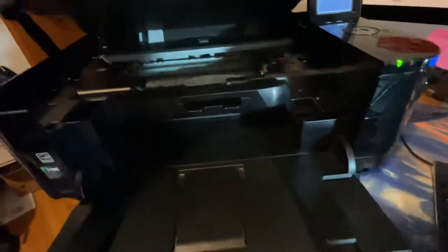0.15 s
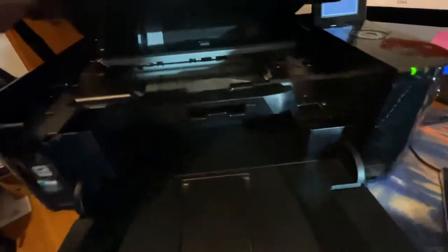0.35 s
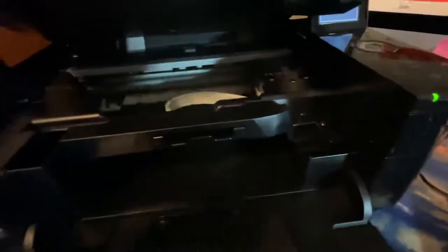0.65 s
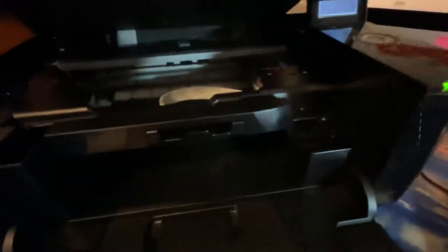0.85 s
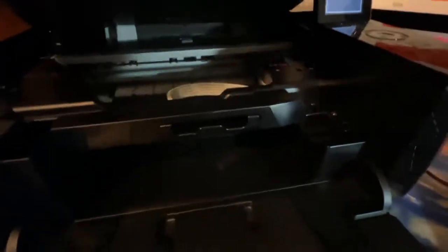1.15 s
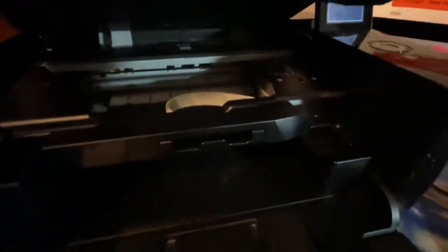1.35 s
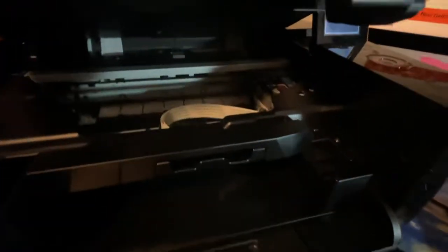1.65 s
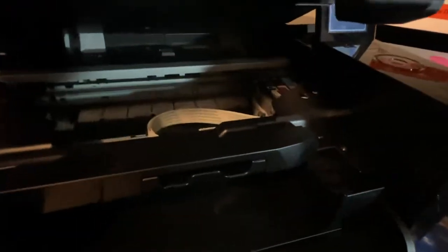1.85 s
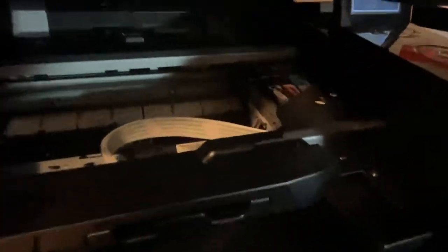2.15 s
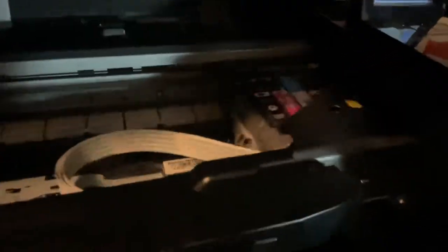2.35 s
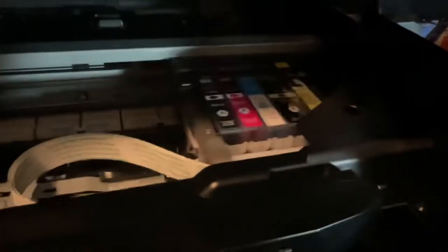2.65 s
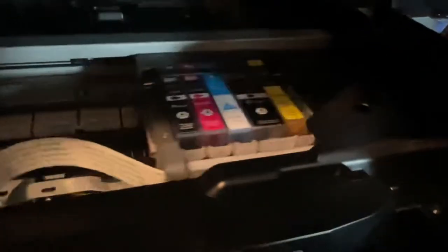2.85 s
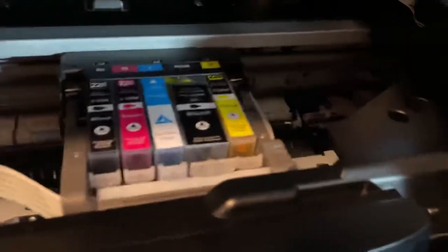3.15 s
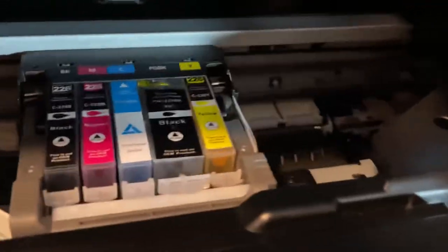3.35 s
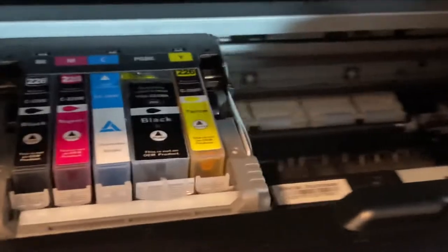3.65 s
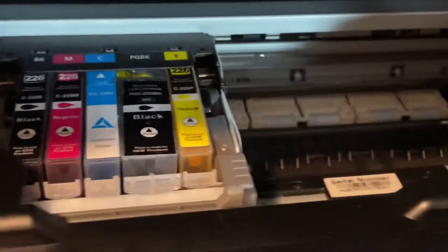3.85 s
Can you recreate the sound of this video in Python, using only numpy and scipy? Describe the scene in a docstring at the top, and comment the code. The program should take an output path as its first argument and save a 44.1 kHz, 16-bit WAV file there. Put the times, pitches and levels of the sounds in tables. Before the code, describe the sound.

An open inkjet printer clatters at once: dense plastic knocks, loudest near 0.15 s, and a sharp snap around 0.29 s. A gear whirr with motor hum fades by 1 s. Quiet room hum and barely audible creaks follow. At 2.05 s a brief motor buzz, then clicks near 2.2 s, release the carriage, which glides softly to 4 s, humming and rumbling in pulses with faint hiss, increasingly close; tiny ticks near 3.3 s.

```python
"""Open inkjet printer, close up

The head-parking mechanism of an open printer rattles and clacks in its plastic case: bursts of tiny contacts
excite the panels, and pawls snap. A gear train whirrs down as friction noise in resonances over a motor hum.
After a pause with faint creaks, a quick motor run frees the carriage with a click. It glides along its rail,
drive humming and rumble swelling with every pulley turn; the ear moves close. A small room and hum surround it."""
import sys
import numpy as np
from scipy import signal
from scipy.fft import rfft, irfft
from scipy.io import wavfile
from scipy.ndimage import map_coordinates

SR = 44100
rng = np.random.default_rng(int(sys.argv[2]) if len(sys.argv) > 2 else 0)


def wav_record(signal):
    """Record a signal, one row per channel, as 16-bit PCM in the file named by sys.argv[1]."""
    frames = np.transpose(np.atleast_2d(signal))
    bounded = np.clip(frames, -1, 1)
    # unit amplitude maps onto the largest positive 16-bit level
    quanta = np.round(bounded * 32767).astype(np.int16)
    wavfile.write(sys.argv[1], SR, quanta)


N = 176400
T = np.arange(N) / SR

# Plastic parts knocking in the case, before the master trim and the decay stretch:
# start_s, thud_db, body_db, crack_db, decay_s
KNOCK_EVENTS = [(0.001, -55, -24.5, -27, 0.0067), (0.009, -27, -32.5, -37, 0.019),
                (0.022, -36, -34, -33.5, 0.013), (0.037, -34, -32, -54, 0.0053),
                (0.0473, -38, -48, -26, 0.0071), (0.058, -48, -32.5, -31, 0.0066),
                (0.081, -39, -32.5, -34, 0.02), (0.1299, -33, -30, -31, 0.003),
                (0.1426, -49, -38, -27.5, 0.0042), (0.1465, -35, -21.5, -17.5, 0.0066),
                (0.1615, -28, -24.5, -29, 0.011), (0.174, -37, -34.5, -37, .006),
                (0.1841, -33, -36, -27.5, 0.0045), (0.199, -36, -61.5, -49, 0.0041),
                (0.2847, -34, -35, -43, 0.0045), (0.323, -49, -41, -47, 0.0043),
                (0.336, -40, -35, -42.5, 0.017), (0.37, -62, -40, -34.5, 0.0045),
                (0.382, -46, -54, -44, 0.0054), (2.0509, -41, -37.5, -38, 0.0054),
                (2.227, -40, -41.5, -47, 0.0077), (2.243, -44, -46, -57, 0.007)]
# Tone of the knock noise: frequency_hz, relative_level_db
KNOCK_SPECTRUM = [(35, -44), (60, -8.5), (186, -11), (302, 2.5), (399, -18.5), (503, -6), (1750, -14.5),
                  (3750, -17.5), (8420, -22.5), (10100, -23.5), (13000, -28.5), (15000, -42)]
# Lower edges of thud, body and crack: edge_hz
KNOCK_EDGES_HZ = [59, 370, 1500]
# Rise of thud, body and crack; the body swells slowest: rise_s
KNOCK_RISE_S = [0.0013, 0.0037, 0.0026]
# Decay stretch of thud, body and crack; the thud rings longest: factor (no unit)
KNOCK_STRETCH = [1.9, 1.5, 0.96]
# Panel resonances, before the case tilt: pitch_hz, width_hz, level_db
CASE_PANELS = [(295, 100, -7), (559.9, 87, -5.5), (1000, 160, -14.5)]
# Small parts ringing likewise, before their group trim: pitch_hz, width_hz, level_db
FRAME_PARTS = [(1998, 77, -3), (2620, 120, 2), (3180, 95, -4.5), (3790, 380, -2), (4360, 30, -6),
               (4460, 66, -6), (5160, 97, -4), (6293, 170, 0), (7700, 35, -14), (9800, 270, -7.5)]
CASE_DB, CASE_DB_PER_OCT, FRAME_DB = 4, 4, -10
# Lightly damped case modes that ring on after a knock, relative to its body: pitch_hz, level_db, t60_s
CASE_MODES = [(506.3, -17.5, 0.15), (808.5, -18, 0.21), (868.5, -17.5, 0.19), (1070, -18.5, .15),
              (1207, -18.5, .15), (1336, -21, 0.22), (1456, -21.5, 0.16), (1559, -21, 0.13),
              (2380, -22.5, 0.16), (2660, -19, .12), (3050, -35, 0.54), (3830, -20, 0.1), (5210, -22, 0.19),
              (5760, -23, .12)]

# A pawl snaps over: start_s, level_db, pitch_hz
PAWL_EVENTS = [(0.276, -34.5, 2450), (0.287, -28.5, 2663), (2.209, -42.5, 2240)]
# Modes of each pawl: share_of_pitch (no unit), relative_level_db, t60_s
PAWL_MODES = [(1.005, -1.5, 0.033), (.87, -13, 0.02), (1.2, -35, 0.016), (0.68, -13, 0.042),
              (0.49, -8, 0.049), (0.332, -11.5, 0.055)]
PAWL_SNAP_DB = -9
# The chassis shudders under the heavier blows: start_s, level_db, pitch_hz
SHUDDER_EVENTS = [(0.008, -30.5, 308.5), (0.013, -37, 68.6), (0.162, -32.5, 68), (0.289, -35.5, 559),
                  (0.329, -34.5, 571), (0.371, -36, 571), (2.054, -37, 589), (2.059, -38, 131),
                  (2.134, -38, 133.4), (2.213, -45, 541), (2.233, -40.5, 115), (2.237, -42.5, 294.3)]
SHUDDER_T60_S = 0.11

# The gear train running down, before the ring and hiss trims: time_s, level_db
GEAR_LEVEL = [(0, -28), (.2, -72), (.27, -53), (.31, -42), (.37, -40), (.44, -48), (.53, -56), (.65, -61.5),
              (.86, -62), (.96, -76.5), (1.03, -89.5), (1.3, -110)]
# Resonances of the gear train at speed 1: pitch_hz, width_hz, relative_level_db
GEAR_RINGS = [(840, 130, -17), (1240, 100, -12.5), (2020, 100, -14), (2610, 100, -21), (4330, 110, -14.5),
              (4480, 100, -15.5), (6320, 140, -19), (8150, 230, -20.5)]
# Tone of the gear hiss: frequency_hz, relative_level_db
GEAR_HISS = [(59, -32.5), (100, -1.5), (270, -11.5), (420, -6.5), (933, -18.5), (2050, -22.5), (3430, -25),
             (4680, -21), (8350, -27), (14000, -50)]
# Speed of the gears: time_s, relative_speed (no unit)
GEAR_SPEED = [(.45, 1.02), (.53, 0.99), (.63, 0.95), (.75, 1.0), (.87, 0.97)]
# Hum of the gear motor: time_s, level_db
GEAR_MOTOR_LEVEL = [(.38, -67), (.45, -53), (.53, -61.5), (.62, -61), (.85, -67), (.92, -77), (1.05, -100)]
# Motor tones at speed 1: pitch_hz, relative_level_db
GEAR_MOTOR_TONES = [(370, -3), (425, -4.5)]
PUFF_S, PUFF_LENGTH_S, PUFF_DB = 1.04, 0.031, -77.5  # a faint hiss as the gears come to rest

# Tone of the quick move that frees the carriage: frequency_hz, relative_level_db
NUDGE_SPECTRUM = [(53, -37.5), (90, -3.5), (144, -2), (325, 0.5), (590, -1.5), (2050, -26.5), (6510, -20),
                  (7730, -26.5), (11900, -23), (13500, -35), (15000, -90)]
NUDGE_START_S, NUDGE_END_S, NUDGE_RELEASE_S, NUDGE_DB = 2.052, 2.146, 0.028, -45.5

# Slow glide: the pulley turns steadily, with one moment of greatest drag per turn
GLIDE_START_S, GLIDE_RISE_S = 2.225, 0.02
PULLEY_HZ, PULLEY_TOP_S = 4.5, 2.645  # turns per second; one moment of greatest drag
DRIVE_HZ, DRIVE_SWING_HZ, DRIVE_DB = 90.8, 20.89, -53.5
SURGE_LAG_S = 0.047  # the drive surges this long after each drag
SWAY_HZ, SWAY_DB = 55.1, -57.5  # the chassis drones in between
# Listening point moves up to the carriage, start and end: time_s
APPROACH_S = [2.894, 3.374]
# Tone of the case rumble: frequency_hz, relative_level_db
RUMBLE_SPECTRUM = [(76, -3.5), (130, -0.5), (167, -8), (202, 1.5), (227, -11), (274, -1.5), (396, -13),
                   (615, -11.5), (936, -25.5), (1600, -35), (2080, -78), (3520, -120)]
RUMBLE_DB, RUMBLE_SWING_DB = -55.5, 2.5
RUMBLE_NEAR_DB = -2.5  # the case rumbles and shakes less close to the carriage
# Tone of the low case shake: frequency_hz, relative_level_db
SHAKE_SPECTRUM = [(15, -47), (25, -54), (43, -6.5), (91, 4.5), (104, 5), (135, 4.5), (160, -13.5),
                  (210, -18.5), (350, -120)]
SHAKE_DB = -57
# Tone of the sliding hiss: frequency_hz, relative_level_db
RAIL_SPECTRUM = [(500, -41), (1000, -1), (1700, -5), (2600, 1), (3900, 3), (5000, -2), (6200, 1),
                 (7500, -22), (10000, -1.5), (13000, -12.5), (15000, -15)]
# Sliding hiss along the rail, before the hiss trim: time_s, level_db
RAIL_LEVEL = [(2.3, -65.5), (3.104, -65), (3.464, -66), (3.478, -64), (4.0, -65.5)]
# Whirr of the passing carriage: time_s, level_db
PASSING_LEVEL = [(2.2, -97), (3.0, -79), (3.42, -84), (3.55, -73), (4, -69.5)]
# Resonances of that whirr: pitch_hz, width_hz, relative_level_db
PASSING_RINGS = [(1970, 71, -1.3), (2590, 100, 0.35), (3830, 73, 0.18)]
# A high ring of the rail: time_s, level_db
RAIL_SING_LEVEL = [(2.3, -85), (2.8, -75), (3.12, -70), (3.25, -78), (3.62, -74), (3.8, -77), (4, -72.5)]
RAIL_SING_HZ, RAIL_SING_WIDTH_HZ = 5650, 81

# Faint soft creaks, timed at their peak: peak_s, level_db, length_s
CREAK_EVENTS = [(1.605, -74.5, .008), (1.755, -70, 0.023), (1.879, -73, 0.03), (1.957, -76.5, 0.032),
                (2.847, -62.5, 0.0084), (3.295, -59.5, 0.0053), (3.367, -53.5, 0.004)]
CREAK_HZ, CREAK_WIDTH_HZ = 742, 170
# Steady background hum: pitch_hz, level_db, waver_hz
HUM_TONES = [(60.8, -64.5, 1.6), (51.2, -78, 1.2), (199, -75.5, 0.31), (244, -85, 2.2)]
# Tone of the quiet room noise: frequency_hz, relative_level_db
FLOOR_SPECTRUM = [(15, -56), (25, -31.5), (42, -5.5), (64, -7.5), (125, -24.5), (202, -19.5), (271, -27),
                  (363, -28.5), (404, -31.5), (1580, -42), (3730, -47.5), (6540, -43), (15000, -59)]
FLOOR_DB = -67.5

# Stereo width from afar: frequency_hz, side_minus_mid_db
WIDTH_FAR = [(60, -6), (240, -13), (500, -4), (900, 0), (1800, 0), (2500, -4), (3400, 3), (4600, -3.5),
             (7900, 3.5), (11000, -6.5), (14000, 6)]
# Stereo width close to the carriage: frequency_hz, side_minus_mid_db
WIDTH_NEAR = [(60, -25), (110, -10), (200, -25), (380, -13), (700, -15.5), (1290, -12), (2380, -19),
              (4400, -40), (8120, 5.5), (15000, -4.5)]
# Stereo lean of the knocks: frequency_hz, left_minus_right_db
LEAN_EARLY = [(60, 2), (150, -0.5), (380, -4.5), (950, 1.5), (2380, -2.5), (5980, 1.5), (15000, -1.5)]
# Stereo lean of the carriage: frequency_hz, left_minus_right_db
LEAN_LATE = [(60, 1.3), (180, 1.5), (550, 1.9), (1650, 0.29), (4970, 1.4), (15000, 0.0)]
ROOM_T60_S, ROOM_DB, ROOM_CUT_HZ = 0.24, -15, 4600
LOW_CUT_HZ, HIGH_CUT_HZ = 30, 15800


def amp(db):
    """Decibels to gain."""
    return 10 ** (np.asarray(db) / 20)


def unit(x):
    """Scale to rms 1."""
    return x / np.sqrt(np.mean(x ** 2) + 1e-20)


def level(rows):
    """Gain over time from time_s, level_db rows."""
    return amp(np.interp(T, *np.transpose(rows)))


def per_bin(points):
    """Gain for every frequency bin from frequency_hz, level_db rows."""
    hz, db = np.transpose(points)
    bins_hz = np.arange(N // 2 + 1) * SR / N
    return amp(np.interp(np.log(bins_hz + 1), np.log(hz), db))


def cut(x, hz, kind, order=3):
    """Butterworth filter."""
    return signal.sosfilt(signal.butter(order, hz, kind, fs=SR, output="sos"), x)


def drift(hz):
    """Random wander through normal knots of spread 1, hz knots per second."""
    knots = rng.standard_normal(400)
    return np.interp(T * hz, np.arange(len(knots)), knots)


def pan(db):
    """Left gain up and right gain down by db."""
    return amp(db * np.array([[1], [-1]]))


def sine(hz):
    """Sine that follows a moving pitch."""
    return np.sin(2 * np.pi * np.cumsum(hz) / SR)


def since(s):
    """Seconds since a moment, zero before it."""
    return np.maximum(T - s, 0)


def swell(s, length):
    """Bell-shaped envelope around a moment."""
    return np.exp(-.5 * ((T - s) / length) ** 2)


def blow(s, rise, decay):
    """Envelope of a blow: a straight rise, then an exponential decay."""
    return np.minimum(since(s) / rise, 1) * np.exp(-since(s + rise) / decay)


def ping(s, hz, t60):
    """A struck mode: a sine that decays by 60 dB in t60 seconds."""
    return np.sin(2 * np.pi * hz * since(s)) * amp(-60 * since(s) / t60)


def noise(spectrum=None, lean=None, width=WIDTH_FAR):
    """Stereo noise with its width, tone and lean set per frequency; rms 1."""
    mid, side = rfft(rng.standard_normal((2, N)))
    side_gain = per_bin(width)
    both = (mid + side * side_gain * [[1], [-1]]) / np.hypot(1, side_gain)
    if spectrum is not None:
        both = both * per_bin(spectrum)
    if lean is not None:
        both = both * per_bin(lean) ** np.array([[.5], [-.5]])
    return unit(irfft(both, N))


def resonate(x, hz, width_hz):
    """One resonance with gain 1 on top."""
    r = np.exp(-np.pi * width_hz / SR)
    feed = np.array([1, 0, -1]) * (1 - r * r) / 2
    return signal.lfilter(feed, [1, -2 * r * np.cos(2 * np.pi * hz / SR), r * r], x + 1e-18)


def rings(table, wander_db=1.0, wander_hz=9):
    """Friction noise in a set of resonances, each swelling and fading by itself; rms 1."""
    x = noise()
    return unit(sum(amp(db + wander_db * drift(wander_hz)) * resonate(x, hz, width)
                    for hz, width, db in table))


def knocks(grain_db=3.5):
    """Each knock is a dying burst of tiny contacts that sets the case ringing."""
    grain = np.repeat(rng.standard_normal(N), 16)[:N]  # held for 16 samples
    contacts = noise(KNOCK_SPECTRUM, LEAN_EARLY) * amp(grain_db * grain)
    low, mid, high = KNOCK_EDGES_HZ
    thud = cut(contacts, [low, mid], "band")
    body = cut(contacts, [mid, high], "band")
    crack = cut(contacts, high, "high")
    force = 0
    for k, band in enumerate((thud, body, crack)):
        envelope = sum(amp(row[1 + k]) * blow(row[0], KNOCK_RISE_S[k], row[-1] * KNOCK_STRETCH[k])
                       for row in KNOCK_EVENTS)
        force = force + unit(band) * envelope
    ringing = 0
    for group_db, table in ((0, CASE_PANELS), (FRAME_DB, FRAME_PARTS)):
        for hz, width, db in table:
            tilt_db = CASE_DB_PER_OCT * np.log2(hz / 1000)
            ringing = ringing + amp(CASE_DB + group_db + db + tilt_db) * resonate(force, hz, width)
    return amp(-3.5) * (force + ringing)  # master trim


def case_modes(db=-2, spread_db=2):
    """Every knock also strikes the lightly damped modes of the case, unequally on each side."""
    s, body_db = np.transpose(KNOCK_EVENTS)[[0, 2]]
    strike_at = np.round((s + KNOCK_RISE_S[1]) * SR).astype(int)
    out = np.zeros((2, N))
    for hz, mode_db, t60 in CASE_MODES:
        uneven_db = spread_db * rng.standard_normal((len(s), 2)).T
        clicks = np.zeros((2, N))
        clicks[:, strike_at] = amp(db + mode_db + body_db + uneven_db)
        r, w = amp(-60 / (t60 * SR)), 2 * np.pi * hz / SR
        out += signal.lfilter([0, np.sin(w)], [1, -2 * r * np.cos(w), r * r], clicks + 1e-18)
    return out


def pawls(pan_db=-2.5, snap_s=0.003):
    """Each pawl gives a sharp noise snap and a cluster of short rings."""
    ringing = sum(amp(db + mode_db) * ping(s, hz * share, t60)
                  for s, db, hz in PAWL_EVENTS for share, mode_db, t60 in PAWL_MODES)
    envelope = sum(amp(db) * blow(s, 0.0006, snap_s) for s, db, hz in PAWL_EVENTS)
    snap = unit(cut(noise(), [1600, 2800], "band", order=2)) * envelope
    return (ringing + amp(PAWL_SNAP_DB) * snap) * pan(pan_db)


def shudders(pan_db=2.0):
    """Decaying low rings of the chassis."""
    return sum(amp(db) * ping(s, hz, SHUDDER_T60_S) for s, db, hz in SHUDDER_EVENTS) * pan(pan_db)


def at_gear_speed(x):
    """The whirr rises and falls in pitch with the speed of the gears."""
    travel = np.cumsum(np.interp(T, *np.transpose(GEAR_SPEED)))
    return np.array([map_coordinates(side, [travel], order=3, mode="wrap") for side in x])


def gears(ring_db=-8.0, hiss_db=-4, rough_db=1.0):
    """Teeth rub in the resonances of the gear train, over a broad hiss."""
    whirr = amp(ring_db) * at_gear_speed(rings(GEAR_RINGS))
    hiss = amp(hiss_db) * noise(GEAR_HISS)
    return level(GEAR_LEVEL) * amp(rough_db * drift(90)) * (whirr + hiss)


def gear_motor(waver_hz=13, flutter_db=4, pan_db=-1):
    """The motor hums at the speed of the gears; a faint hiss follows as they stop."""
    speed = np.interp(T, *np.transpose(GEAR_SPEED))
    hum = sum(amp(db + flutter_db * drift(43)) * sine(hz * speed + waver_hz * drift(40))
              for hz, db in GEAR_MOTOR_TONES)
    hiss = unit(cut(noise(), [1500, 10000], "band", order=2))
    puff = amp(PUFF_DB) * swell(PUFF_S, PUFF_LENGTH_S) * hiss
    return level(GEAR_MOTOR_LEVEL) * hum * pan(pan_db) + puff


def nudge(rough_db=2.0):
    """A short fast run of the carriage motor, as rough noise through a gate."""
    gate = np.minimum(since(NUDGE_START_S) / 0.0069, 1) * np.exp(-since(NUDGE_END_S) / NUDGE_RELEASE_S)
    return amp(NUDGE_DB + rough_db * drift(90)) * gate * noise(NUDGE_SPECTRUM, LEAN_LATE)


def sliding(spectrum, near):
    """Friction noise crossfading at equal power from its far stereo image to its near one."""
    far_noise = noise(spectrum, LEAN_LATE)
    near_noise = noise(spectrum, width=WIDTH_NEAR)
    return np.sqrt(1 - near) * far_noise + np.sqrt(near) * near_noise


def glide(hiss_db=1.0, waver_hz=2.34, flutter_db=2.5, rough_db=2.5):
    """Drive pitch surges and rumble swells once per pulley turn, while the carriage hisses along the rail."""
    near = np.interp(T, APPROACH_S, [0, 1])
    near_db = near * RUMBLE_NEAR_DB
    turn = 2 * np.pi * PULLEY_HZ * (T - PULLEY_TOP_S)
    # half the turn angle to an even power: one narrow surge per turn
    surge = np.cos(turn / 2 - np.pi * PULLEY_HZ * SURGE_LAG_S) ** 10
    drive_tone = unit(sine(DRIVE_HZ + DRIVE_SWING_HZ * surge + waver_hz * drift(40)))
    drive = amp(DRIVE_DB + flutter_db * drift(40)) * drive_tone * pan(2.8 * (1 - near))
    sway = amp(SWAY_DB - 4.7 * np.cos(turn)) * unit(sine(SWAY_HZ + 2 * drift(27)))
    rumble_db = RUMBLE_DB + RUMBLE_SWING_DB * np.cos(turn) + rough_db * drift(90) + near_db
    rumble = amp(rumble_db) * sliding(RUMBLE_SPECTRUM, near)
    shake = amp(SHAKE_DB + near_db) * sliding(SHAKE_SPECTRUM, near)
    hiss = amp(hiss_db) * level(RAIL_LEVEL) * sliding(RAIL_SPECTRUM, near)
    passing = level(PASSING_LEVEL) * rings(PASSING_RINGS)[0]  # one channel, so centred
    ring = unit(resonate(noise(width=WIDTH_NEAR), RAIL_SING_HZ, RAIL_SING_WIDTH_HZ))
    sing = level(RAIL_SING_LEVEL) * ring
    fade_in = np.minimum(since(GLIDE_START_S) / GLIDE_RISE_S, 1)
    return fade_in * (drive + sway + rumble + shake + hiss + passing + sing)


def creaks():
    """Soft swells of noise narrowed by two passes through one resonance."""
    once = resonate(noise(), CREAK_HZ, CREAK_WIDTH_HZ)
    tone = unit(resonate(once, CREAK_HZ, CREAK_WIDTH_HZ))
    return tone * pan(2.5) * sum(amp(db) * swell(s, length) for s, db, length in CREAK_EVENTS)


def cavity(x, echo_db=-4, decay_s=0.0026):
    """Dense early echoes inside the case colour the treble, differently on each side."""
    burst = rng.standard_normal((2, N))
    echoes = unit(cut(burst, 970, "high") * blow(0, 0.00037, decay_s)) / np.sqrt(N)
    return x + amp(echo_db) * signal.fftconvolve(x, echoes, axes=1)[:, :N]


def room(x):
    """A short dull noise tail, different on each side."""
    dull = cut(rng.standard_normal((2, N)), ROOM_CUT_HZ, "low", order=1)
    tail = dull * blow(0.0058, 0.0054, ROOM_T60_S / np.log(1000))
    return amp(ROOM_DB) * signal.fftconvolve(x, unit(tail) / np.sqrt(N), axes=1)[:, :N]


def background():
    """Wavering hum tones over quiet room noise."""
    hum = sum(amp(db) * unit(sine(hz + waver * drift(33))) for hz, db, waver in HUM_TONES)
    return hum * pan(-1.8) + amp(FLOOR_DB) * noise(FLOOR_SPECTRUM)


def scene():
    """The printer in its room; only the clatter excites the room tail."""
    clatter = cavity(knocks() + case_modes()) + pawls() + shudders()
    motion = cavity(gears() + nudge()) + gear_motor() + glide()
    return clatter + room(clatter) + motion + creaks() + background()


def record(dry):
    """The deepest bass and the very top are cut."""
    bass_cut = cut(dry, LOW_CUT_HZ, "high", order=3)
    return signal.sosfilt(signal.cheby2(12, 70, HIGH_CUT_HZ, fs=SR, output="sos"), bass_cut)


dry = scene()
out = record(dry)
wav_record(out)
```